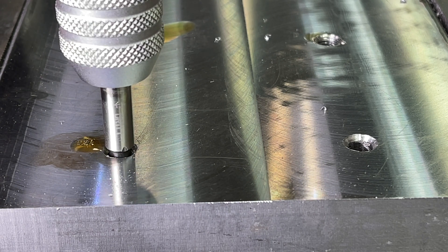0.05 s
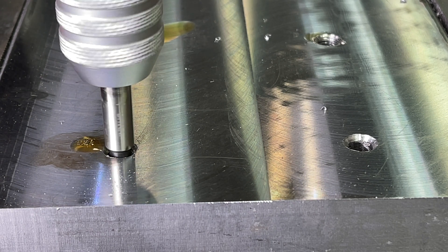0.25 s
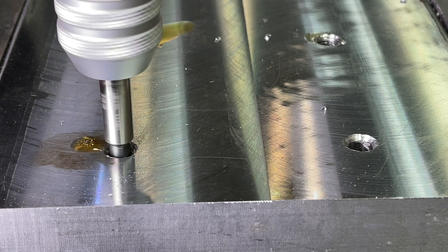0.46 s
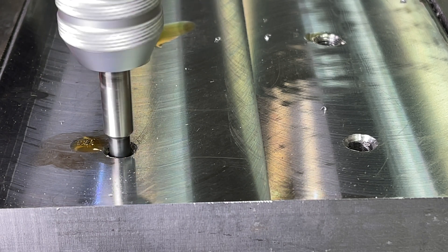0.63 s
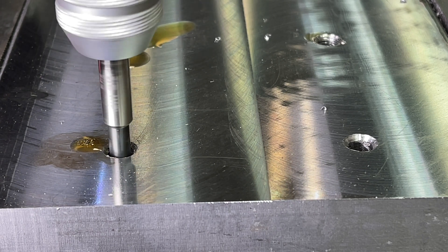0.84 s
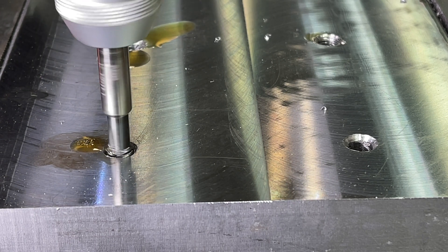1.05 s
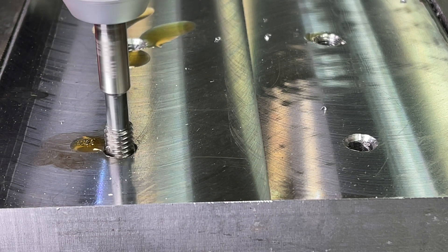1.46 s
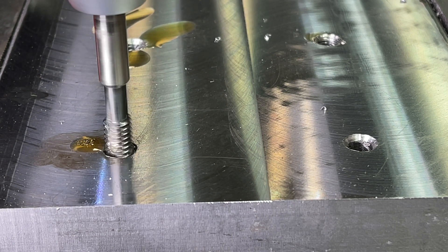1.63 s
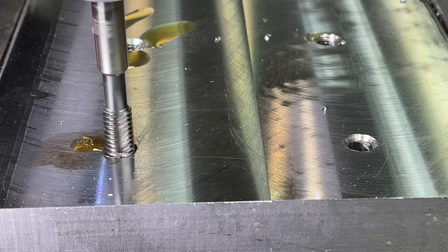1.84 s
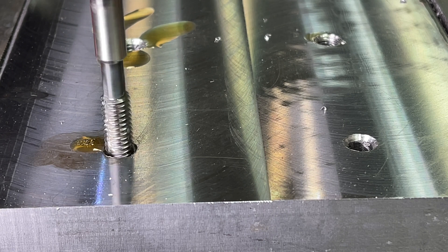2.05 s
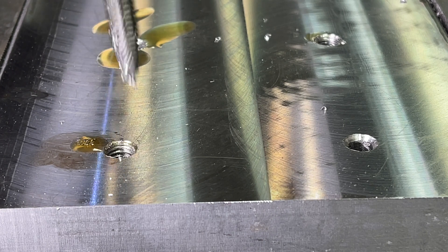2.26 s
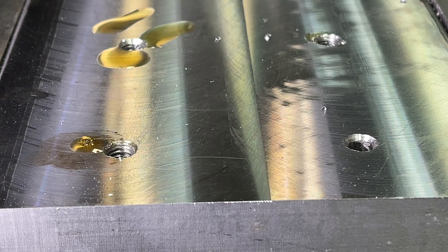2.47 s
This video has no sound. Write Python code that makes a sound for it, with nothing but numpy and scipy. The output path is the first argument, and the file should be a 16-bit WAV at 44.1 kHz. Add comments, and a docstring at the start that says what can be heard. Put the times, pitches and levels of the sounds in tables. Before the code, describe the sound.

A cordless drill spins up, whines and grinds backing out of metal, then stops abruptly.

```python
"""A cordless drill backs a threading tap out of a steel plate, close by in a small workshop.
The trigger clicks; at 0.2 s the drive whistles at its switching rate and the motor spins up, buzzing the
shell. The tap bumps and judders in the tight thread while motor whine and gear tones rise over the
grinding gearbox. From 1.5 s the grinding thins as the thread lets go. At 2.3 s the brake bites and the
gears clatter to a halt, leaving room noise and a hum."""
import sys
import numpy as np
from scipy import signal
from scipy.fft import rfft, irfft
from scipy.io import wavfile

SR = 44100
rng = np.random.default_rng(int(sys.argv[2]) if len(sys.argv) > 2 else 0)


def unload_audio(sound):
    """Save the sound as a 16-bit wav file, at the path given as the first command line argument."""
    columns = np.transpose(np.atleast_2d(sound))
    # keep every value between -1 and 1, then stretch to whole-number steps
    steps = np.round(np.clip(columns, -1, 1) * 32767)
    wavfile.write(sys.argv[1], SR, steps.astype(np.int16))


N = 114660
T = np.arange(N) / SR
BINS_HZ = np.maximum(np.arange(N // 2 + 1) * SR / N, 1)
SWITCH_ON_S, BRAKE_S, HALT_S = 0.202, 2.305, 2.325
SHELL_HZ, SHELL_WIDTH_HZ = 2820, 130


def from_db(db):
    """Decibels to gain."""
    return 10 ** (np.asarray(db) / 20)


def unit_rms(x):
    """Scale to unit power."""
    return x / np.sqrt(np.mean(x ** 2) + 1e-20)


def curve(rows):
    """Straight lines through (t/s, value) rows."""
    return np.interp(T, *np.transpose(rows))


def bin_gains(rows):
    """Gain per FFT bin from (f/Hz, level/dB) rows."""
    hz, db = np.transpose(rows)
    return from_db(np.interp(np.log(BINS_HZ), np.log(hz), db))


def drift(rate_hz):
    """Slow random wander, unit rms."""
    return unit_rms(irfft(rfft(rng.standard_normal(N)) / (1 + (BINS_HZ / rate_hz) ** 2), N))


def gate(start_s, end_s, attack_s, t60_s):
    """Rise, hold, decay."""
    return np.clip((T - start_s) / attack_s, 0, 1) * from_db(-60 * np.maximum(T - end_s, 0) / t60_s)


def swell(peak_s, width_s):
    """Bell curve, peak 1."""
    return np.exp(-((T - peak_s) / width_s) ** 2)


def tone(phase, rms_db):
    """Sine with a random start phase."""
    return np.sqrt(2) * from_db(rms_db) * np.sin(phase + rng.uniform(0, 2 * np.pi))


def shell_mode(x, hz, width_hz):
    """One resonance of the drill's shell, peak gain 1."""
    r = np.exp(-np.pi * width_hz / SR)
    feedback = [1, -2 * r * np.cos(2 * np.pi * hz / SR), r * r]
    return signal.lfilter(np.array([1, 0, -1]) * (1 - r * r) / 2, feedback, x + 1e-18)


# Stereo width: f/Hz, side re mid/dB
NOISE_WIDTH = [(60, -20), (300, -8), (1000, -12), (2800, -17), (5000, -28), (8000, -24), (11500, -13)]

def noise(spectrum, pulses=1):
    """Stereo noise, pulsed, then coloured; unit rms."""
    mid, side = rfft(rng.standard_normal((2, N)) * pulses) * bin_gains(spectrum)
    side = side * bin_gains(NOISE_WIDTH)
    return unit_rms(irfft(np.array([mid + side, mid - side]), N))


# Motor speed as the pitch of the lowest gear tone: t/s, f/Hz
SPEED_RISING = [(.2, 85.3), (.215, 115.1), (.29, 151.9), (.312, 195.3), (.333, 325.5), (.35, 361.3),
                (.365, 412.3), (.39, 454.6), (.42, 492), (.45, 516), (.5, 534.5)]
SPEED_RUNNING = [(.55, 551.5), (.612, 551), (.63, 572), (.647, 561.5), (.76, 574.7), (.85, 578.1),
                 (1.148, 575.5), (1.32, 583.6), (1.5, 590.8), (1.7, 590.2), (2.07, 600.7), (2.25, 613.2)]
SPEED_BRAKING = [(2.283, 609), (2.305, 572), (2.313, 415), (2.324, 373), (2.335, 296), (2.349, 100.2)]

def shaft_angle(judder_hz=27.01, judder_end_s=1.58):
    """Rotation in rad; the speed jitters, and the tap judders while the thread is tight."""
    tightness = np.clip(1 - T / judder_end_s, 0, 1)
    judder = .006 * tightness * np.sin(2 * np.pi * judder_hz * T + drift(8))
    jitter = 0.0013 * drift(24.5)
    speed_hz = curve(SPEED_RISING + SPEED_RUNNING + SPEED_BRAKING) * (1 + judder + jitter)
    return 2 * np.pi * np.cumsum(speed_hz) / SR


# Commutation whine: t/s, level/dB
WHINE_LEVEL = [(.32, -100), (.37, -45), (.42, -56), (.51, -54.5), (.55, -44), (.67, -39), (.76, -36),
               (1.22, -37), (1.5, -33), (1.85, -33), (2.12, -34), (2.22, -38.5), (2.295, -39), (2.305, -56)]
# Brief dropouts in the motor whine: t/s, gain/dB
WHINE_DIPS = [(.666, -15), (2.085, -5)]
# Whistles at switching rate plus and minus the whine: t/s, level/dB
UPPER_LEVEL = [(.2, -55), (.32, -49), (.345, -43), (.4, -41), (.44, -36.5), (1.1, -35), (1.65, -36.5),
               (1.9, -39.5), (2.15, -38.5), (2.2, -44), (2.265, -38.5), (2.29, -67)]
LOWER_LEVEL = [(.2, -46), (.218, -42.5), (.225, -47), (.232, -40), (.27, -39), (.28, -53), (.288, -40),
               (.33, -42), (.39, -48.5), (.47, -39), (.64, -48.5), (.8, -42), (1.35, -47), (1.75, -43),
               (2.19, -44), (2.26, -58.5)]

def motor(angle, switching_hz=7691, fully_on_s=0.316):
    """Commutation whine at twice the speed, and its sidebands around the drive's switching rate."""
    carrier = 2 * np.pi * switching_hz * T
    dips_db = sum(db * swell(s, width_s=0.0044) for s, db in WHINE_DIPS)
    whine = tone(2 * angle, curve(WHINE_LEVEL) + dips_db + 0.48 * drift(61.5))
    upper = tone(carrier + 2 * angle, curve(UPPER_LEVEL) + 0.73 * drift(32))
    lower = tone(carrier - 2 * angle + 0.21 * drift(50), curve(LOWER_LEVEL) + 1.45 * drift(60))
    overtone = tone(2 * carrier - 2 * angle, rms_db=-65) * gate(SWITCH_ON_S, fully_on_s, .002, .1)
    return (whine + upper + lower + overtone) * gate(SWITCH_ON_S, BRAKE_S, 0.0011, 0.016)


# Gear tones: multiple of the speed
MESH_ORDERS = [1, 1.5, 3.5, 4, 4.5, 5, 6, 6.5, 8, 10, 12]
# Row per order, level/dB at each load stage: racing up, nearing speed, breaking loose,
# deep in the thread, lightly loaded, last turns, running free
MESH_LEVELS = [(-76, -57, -50, -53.5, -55, -58.5, -60.5), (-71, -80, -63.5, -67, -66, -67.5, -74),
               (-65, -60, -53, -66.5, -71, -70, -82), (-53, -53, -57, -67, -47.5, -50, -63.5),
               (-59, -71, -61, -59, -58.5, -55, -68.5), (-67, -61, -55, -52, -64.5, -62, -68),
               (-51.5, -44, -45.5, -58.5, -51, -65.5, -55), (-60, -65, -64, -58.5, -53.5, -77, -68),
               (-43.5, -51, -60, -58.5, -58.5, -67.5, -69.5), (-72, -59, -62, -53.5, -48.5, -50, -50.5),
               (-65, -53.5, -52, -55, -56.5, -53.5, -57)]
# Load stages, the first three times fading in and holding stage one: t/s
LOAD_TIMES_S = [.305, .335, .365, .45, .63, 1.1, 1.6, 2.14, 2.25]
# Phase smear, largest in the tight thread: t/s, rms per order/rad
MESH_BLUR = [(.35, .1), (.45, .15), (.8, .1), (1.3, .06)]

def gears(angle, fade_db=25, squeal_order=8):
    """Mesh tones follow the load, waver more at high orders and flare at the shell's resonance."""
    mesh = 0
    for order, (first_db, *later_db) in zip(MESH_ORDERS, MESH_LEVELS):
        load_db = np.interp(T, LOAD_TIMES_S, [first_db - fade_db, first_db, first_db, *later_db])
        waver_db = 3 * np.sqrt(order / 10) * drift(25)
        squeal_db = (order == squeal_order) * 14.5 * swell(.3435, width_s=0.012)
        phase = order * (angle + curve(MESH_BLUR) * drift(60))
        mesh = mesh + tone(phase, load_db + waver_db + squeal_db)
    flare = 1.43 * shell_mode(mesh, SHELL_HZ, SHELL_WIDTH_HZ)
    return (mesh + flare) * gate(SWITCH_ON_S, BRAKE_S, 0.0083, 0.029)


# Grinding of gears and tap: t/s, level before boost/dB
GRIND_ENVELOPE = [(.21, -59.5), (.29, -60), (.33, -48.5), (.42, -47.5), (.62, -46), (.72, -48.5),
                  (1.15, -48.5), (1.4, -51.5), (1.75, -52.5), (2.05, -54), (2.19, -53.5), (2.23, -54.5),
                  (2.3, -60)]
# Grinding colour: f/Hz, relative level/dB
GRIND_SPECTRUM = [(30, -66), (65, -35.5), (110, -20), (300, -18), (450, -19.5), (620, -13), (780, -12.5),
                  (950, -12.5), (1400, -7.5), (1720, -15.5), (2000, -12.5), (2200, -13.5), (2600, -2.5),
                  (2870, -1), (3120, -9), (3400, -8), (3900, -10.5), (4500, -13), (5500, -5), (6300, -5),
                  (7000, 0.5), (7700, -7.5), (8600, -5.5), (9300, -11), (10300, -28.5), (11300, -6),
                  (12600, -20), (13300, -51)]

def grinding(angle, boost_db=9, thin_from_s=1.47, thin_db=5, thin_band_hz=(2800, 5100)):
    """Sliding teeth: noise pulses with the mesh; its middle band thins as the thread lets go."""
    level = from_db(curve(GRIND_ENVELOPE) + boost_db + 1.66 * drift(60))
    grind = noise(GRIND_SPECTRUM, pulses=1 + 0.21 * np.cos(4 * angle))
    middle = signal.sosfilt(signal.butter(1, thin_band_hz, "band", fs=SR, output="sos"), grind)
    thinning = 1 - from_db(np.interp(T, [thin_from_s, BRAKE_S], [0, -thin_db]))
    return (grind - thinning * middle) * level * gate(SWITCH_ON_S, BRAKE_S, 0.0025, 0.056)


# Shell buzz, strongest at spin-up: t/s, level/dB
BUZZ_LEVEL = [(.2, -57), (.245, -49.5), (.265, -54), (.295, -49.5), (.31, -37), (.325, -41.5), (.36, -45),
              (.385, -49), (.41, -49.5), (.7, -64.5)]

def shell_buzz(angle, rasp_hz=3150, rasp_width_hz=420):
    """The hard-pulling motor kicks the shell at each commutation: an uneven ring in a broader rasp."""
    kicks = rng.standard_normal(N) * (1 + np.cos(2 * angle)) * from_db(1.5 * drift(50))
    ring = shell_mode(kicks, SHELL_HZ, SHELL_WIDTH_HZ)
    rasp = shell_mode(shell_mode(kicks, rasp_hz, rasp_width_hz), rasp_hz, rasp_width_hz)
    envelope = from_db(curve(BUZZ_LEVEL)) * gate(SWITCH_ON_S, BRAKE_S, 0.0058, .05)
    return unit_rms(ring + 0.34 * rasp) * envelope


# Growl at 2, 4 and 6 times the speed: level/dB
GROWL_LEVELS = [-36.5, -37.5, -43]
# Tooth impacts: t/s, level/dB
TOOTH_KNOCKS = [(2.3055, -26.5), (2.3095, -34), (2.3148, -30.5), (2.3178, -29.5), (2.321, -30),
                (2.3242, -28)]
# Impact colour: f/Hz, relative level/dB
KNOCK_SPECTRUM = [(150, -41), (500, -36), (1100, -7), (1850, -7.5), (2300, 1), (3000, 6.5), (3800, 7),
                  (4400, 0), (5400, 6), (6300, -7.5), (7200, 0.5), (8500, -7), (10000, -12), (11500, -7.5),
                  (13500, -31)]

def brake(angle, growl_s=2.312):
    """The braked motor growls downward, gear teeth knock together and the chuck rings briefly."""
    growl = sum(tone(2 * (k + 1) * angle, db) for k, db in enumerate(GROWL_LEVELS))
    knock_power = sum((from_db(db) * gate(s, s, 0.00026, t60_s=0.036)) ** 2 for s, db in TOOTH_KNOCKS)
    ring_power = (from_db(-45) * gate(HALT_S, HALT_S, .002, t60_s=.11)) ** 2
    clatter = noise(KNOCK_SPECTRUM) * np.sqrt(knock_power + ring_power)
    return growl * gate(growl_s, HALT_S, 0.015, 0.035) + clatter


# Trigger and switch clicks; dull bumps of the tap in the plate: t/s, level/dB, t60/s
TRIGGER_CLICKS = [(0.06, -53, 0.017), (.065, -57.5, 0.16), (0.1664, -43, 0.028), (0.204, -45, 0.036)]
TAP_BUMPS = [(.39, -55, 0.24), (.47, -58, .25), (.628, -48, 0.13)]
# Their colours: f/Hz, relative level/dB
CLICK_SPECTRUM = [(500, -36), (2000, -30), (2900, -5), (4200, -17), (5400, -9.5), (7000, -8), (8300, 1.5),
                  (9800, -17), (11400, -14), (14000, -33)]
BUMP_SPECTRUM = [(40, -42.5), (110, -8), (190, 1), (280, -19), (500, -7), (800, 1.5), (1500, -23),
                 (4000, -57)]

def contacts(hits, spectrum):
    """Small impacts: decaying noise bursts of one colour."""
    return noise(spectrum) * sum(from_db(db) * gate(s, s, 0.00048, t60_s) for s, db, t60_s in hits)


def workshop_reverb(x, delay_s=0.0085, t60_s=0.17, cutoff_hz=5910, gain_db=-21.5):
    """Short, dull, diffuse tail of a small room."""
    tail = rng.standard_normal((2, N)) * gate(delay_s, delay_s, .002, t60_s)
    tail = signal.sosfilt(signal.butter(2, cutoff_hz, fs=SR, output="sos"), tail[:, :SR // 2])
    tail = tail / np.sqrt(np.sum(tail ** 2) / 2)
    return from_db(gain_db) * signal.fftconvolve(x, tail, axes=1)[:, :N]


# Workshop noise: f/Hz, relative level/dB
ROOM_SPECTRUM = [(25, -46), (60, -40), (115, -5.5), (150, -9), (190, 13.5), (240, -4), (380, 2), (470, -12),
                 (580, -3), (900, -13.5), (1500, -12.5), (3000, -16), (5000, -29), (9000, -34),
                 (14000, -53)]

def background(noise_db=-62.5, hum_hz=187, hum_db=-70.5):
    """Room noise and an unsteady hum."""
    room = from_db(noise_db) * noise(ROOM_SPECTRUM)
    return room + tone(2 * np.pi * hum_hz * T + 0.5 * drift(6.1), hum_db)


# Balance: f/Hz, left re right/dB
LEFT_BALANCE = [(100, 0.5), (180, -2.5), (300, 1.5), (600, 5.5), (1170, 4.5), (2300, -0.5)]
# Phase lead of the left microphone: f/Hz, phase/rad
LEFT_LEAD = [(200, -.2), (600, .55), (860, .6), (1200, .35), (2000, 0), (2350, 0), (2900, .5), (3500, .65),
             (4100, .05), (8300, 0), (8850, -.7), (11500, -.65)]

def stereo_image(mix):
    """Level and phase offsets, split evenly between the channels."""
    half_lead = 0.5 * np.interp(BINS_HZ, *np.transpose(LEFT_LEAD))
    left = np.sqrt(bin_gains(LEFT_BALANCE)) * np.exp(1j * half_lead)
    return irfft(rfft(mix) * np.array([left, 1 / left]), N)


def scene():
    """One shaft angle drives all rotating parts; only the mechanical noises feed the reverb."""
    angle = shaft_angle()
    mechanics = gears(angle) + grinding(angle) + shell_buzz(angle) + brake(angle)
    mechanics += contacts(TRIGGER_CLICKS, CLICK_SPECTRUM) + contacts(TAP_BUMPS, BUMP_SPECTRUM)
    return stereo_image(motor(angle) + mechanics + workshop_reverb(mechanics) + background())


def record(dry):
    """Steep low-pass, 70 dB down from 16450 Hz."""
    return signal.sosfilt(signal.cheby2(12, 70, 16450, fs=SR, output="sos"), dry)


dry = scene()
out = record(dry)
unload_audio(out)
```